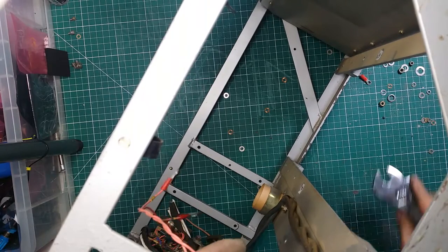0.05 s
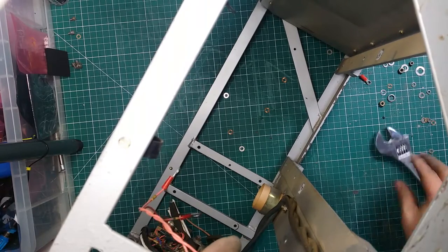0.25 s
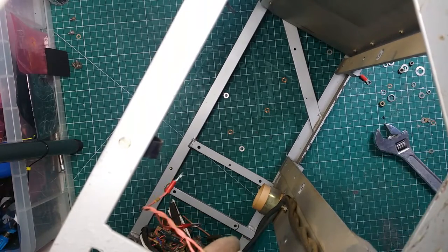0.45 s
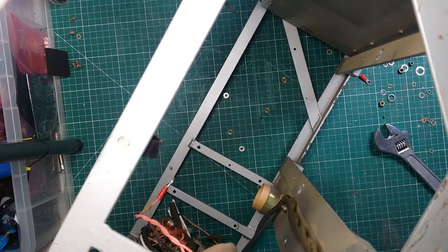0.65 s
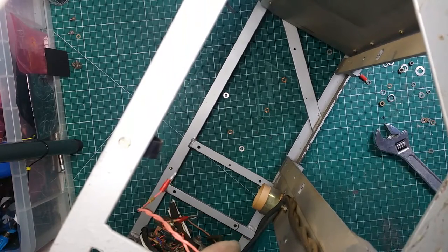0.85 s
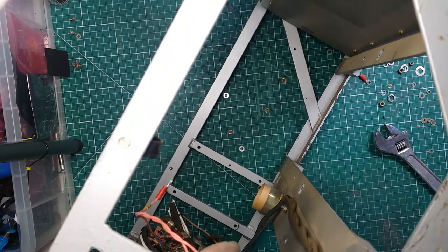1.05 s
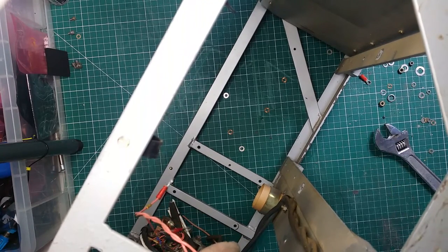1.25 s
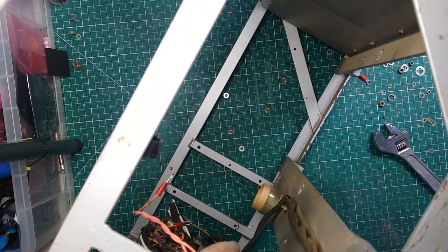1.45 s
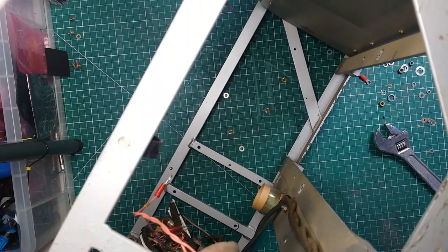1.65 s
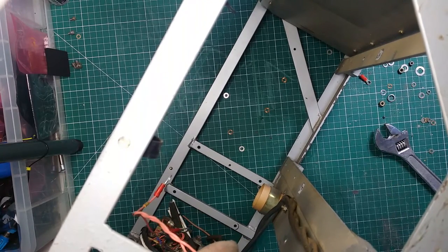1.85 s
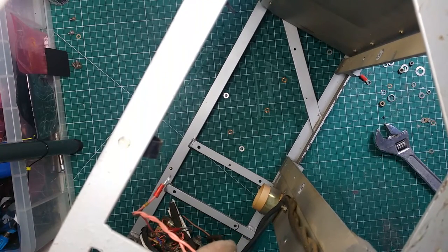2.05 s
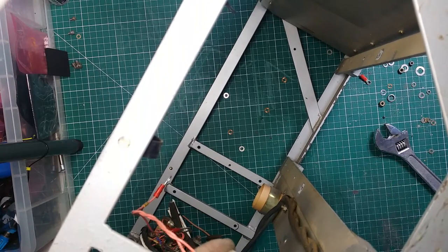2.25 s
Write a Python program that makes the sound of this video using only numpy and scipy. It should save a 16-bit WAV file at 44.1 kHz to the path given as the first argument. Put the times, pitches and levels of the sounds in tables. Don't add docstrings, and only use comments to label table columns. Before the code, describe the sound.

Heavy wrench set down with a thudding, rattling clatter, followed by quiet clinks and soft knocks

```python
import sys
import numpy as np
from scipy import signal
from scipy.fft import irfft
from scipy.io import wavfile
from scipy.ndimage import uniform_filter1d

SR = 44100
rng = np.random.default_rng(int(sys.argv[2]) if len(sys.argv) > 2 else 0)


def volts(x):
    e = np.asarray(x, float) / 20
    return 10 ** e


def persist_wave(psi):
    counts = np.round(np.clip(psi, -1, 1) * 32767).astype(np.int16)
    wavfile.write(sys.argv[1], SR, np.atleast_2d(counts).T)


N = 101429

# (frequency [Hz], level [dB])
BOARD_TONE = [(180, -55), (300, 3.5), (443, -3.5), (1130, -5), (1630, -7), (3440, -14.5), (4000, -14),
              (5200, -20), (8800, -120)]
PART_LAG_S = 0.0005


def evened(x):
    return x / np.sqrt(np.mean(x ** 2) + 1e-20)


def read(points, hz):
    f, value = np.transpose(points)
    return np.interp(np.log(hz + 1), np.log(f + 1), value)


def favour(f, hz, db, octaves):
    return db * np.exp(-(np.log2(np.asarray(f) / hz) / octaves) ** 2)


def add(mix, s, sound):
    part = mix[..., round(s * SR):][..., :sound.shape[-1]]
    part += sound[..., :part.shape[-1]]


def colour(x, points):
    hz = np.fft.rfftfreq(2048, 1 / SR)
    low_end = (points[0][0] / 4, -60)
    log = np.log(volts(read([low_end] + list(points), hz)))
    mirrored = np.r_[log, log[-2:0:-1]]
    taps = irfft(np.exp(signal.hilbert(mirrored).conj()[:1025]))
    return signal.oaconvolve(x, taps / np.linalg.norm(taps))[:len(x)]


def ring(modes, extra_db, size=12000, phase=0., longest=0.98):
    t = np.arange(size)[:, None] / SR
    hz, db, t60 = np.transpose(modes)
    gain = volts(db + extra_db)
    fade = volts(-60 * t / np.clip(t60, .02, longest))
    sines = gain * fade * np.sin(2 * np.pi * hz * t + phase)
    return sines.sum(1) / np.linalg.norm(gain)


def clicks(fade, per_s, uneven_db):
    draw = rng.random((3, len(fade)))
    hit = (draw[0] < per_s / SR) | (np.arange(len(fade)) == 0)
    size = volts(uneven_db * np.minimum(-np.log(draw[2]), 2.2))
    train = hit * np.sign(draw[1] - .5) * size * fade
    return train * np.linalg.norm(fade) / (np.linalg.norm(train) + 1e-9)


def placed(x, pan_db, lag_s=0.):
    late = np.r_[np.zeros(round(lag_s * SR)), x][:len(x)]
    return np.array([x * volts(pan_db / 2), late * volts(-pan_db / 2)])


def room(x, wet_db):
    # (frequency [Hz], time to fall 60 dB [s])
    echo_times = [(100, 0.44), (500, 0.21), (4000, 0.16), (15000, 0.12)]
    mono_hz, thin_hz = 200, 300
    at = np.arange(60, 22000, 20) + rng.integers(0, 20, (2, 1097))
    taps = np.zeros((2, 22050))
    np.put_along_axis(taps, at, rng.choice([-1., 1.], at.shape), 1)
    hz, t, z = signal.stft(taps, SR, nperseg=512)
    same = 1 / (1 + (hz[:, None] / mono_hz) ** 2)
    z = np.array([z[0], same * z[0] + np.sqrt(1 - same ** 2) * z[1]])
    fade = volts(-60 * t / read(echo_times, hz)[:, None])
    tail = signal.istft(z * fade, SR, nperseg=512)[1]
    tail = signal.lfilter(*signal.butter(1, thin_hz, 'high', fs=SR), tail / np.linalg.norm(tail[0]))
    return x + volts(wet_db) * signal.fftconvolve(x, tail, axes=1)[:, :N]


def air():
    # (frequency [Hz], level [dB])
    hush_tone = [(25, -41), (60, 5.5), (300, -0.5), (600, -9), (1300, -15), (7000, -13.5), (9000, -21),
                 (15500, -27)]
    # (frequency [Hz], likeness [0 to 1])
    likeness = [(40, .9), (300, .6), (2000, .2)]
    # (frequency [Hz], width [Hz], level [dB])
    hiss_bands = [(7130, 140, -78.5)]
    hush_db, patchy_db = -57, 1.5
    lumpy_db, lumpy_hz = 1, 350

    frames, hz = N // 256 + 5, np.fft.rfftfreq(1024, 1 / SR)
    a, b, c, d, patches = rng.standard_normal((frames, 513, 5)).T
    patches = evened(uniform_filter1d(uniform_filter1d(patches, 10, 0), 12, 1))
    swell = evened(uniform_filter1d(rng.standard_normal(frames), size=9))
    lumps = lumpy_db * swell / (1 + (hz[:, None] / lumpy_hz) ** 2)
    same = np.clip(read(likeness, hz), -1, 1)[:, None]
    left = a + 1j * b
    right = same * left + np.sqrt(1 - same ** 2) * (c + 1j * d)
    z = np.array([left, right]) * volts(patchy_db * patches + lumps)

    def noise(gain):
        return evened(signal.istft(z * gain[:, None], nperseg=1024, noverlap=768)[1][:, :N])

    hush = volts(hush_db) * noise(volts(read(hush_tone, hz)))
    for f, width, db in hiss_bands:
        hush = hush + volts(db) * noise(np.exp(-((hz - f) / max(width, 30)) ** 2))
    return hush


def bumps():
    # (time [s], level [dB], pitch [Hz])
    flexes = [(.0, -55.5, 48), (.275, -49, 60), (0.384, -31.5, 113.4), (.555, -44.5, 71), (0.638, -49, 99),
              (0.821, -54, 61.6), (1.029, -59, 66), (1.332, -46.5, 108), (1.538, -50.5, 61),
              (1.765, -47.5, 64.5), (2.142, -50, 63.4)]
    bump_s = .055
    out, t = np.zeros(N), np.arange(0, bump_s, 1 / SR)
    swell = np.sin(np.pi * t / bump_s) ** 2
    for s, db, hz in flexes:
        add(out, s, volts(db) * swell * np.sin(2 * np.pi * hz * t))
    return placed(out, -8)


def knocks():
    # (time [s], level [dB], pitch [Hz], rap share [dB], rap colour [Hz])
    soft_knocks = [(0.027, -48.5, 301, -5.5, 2050), (0.576, -43, 194, -5.5, 610),
                   (0.859, -50.5, 307, -13, 510), (0.909, -40, 202, -6, 706), (0.993, -45.5, 137, -21, 390),
                   (1.034, -45, 304, -8.5, 900), (1.11, -39, 201, -21, 1875), (1.164, -46, 175, -26.5, 470),
                   (1.306, -33, 203, -7.5, 698), (1.417, -39, 204.4, -21.5, 387),
                   (1.497, -43, 300, -6.5, 706), (1.526, -40, 250, -12.5, 493),
                   (1.641, -44, 154, -14.5, 390), (1.556, -36, 158, -5.5, 910),
                   (1.744, -33, 196, -10, 1077), (1.763, -32, 219, -13, 1030),
                   (1.841, -40.5, 190, -20, 1420), (1.965, -36.5, 208, -21, 674),
                   (1.984, -46.5, 225, -31, 600), (2.244, -47, 223, -22, 600),
                   (2.034, -39, 192, -22.5, 1470), (2.149, -33.5, 211, -8.5, 980)]
    knock_t60, rap_t60, board_s = 0.1, .07, 0.02
    rap_ring_db = -4
    out, t, f = np.zeros(N), np.arange(6000) / SR, np.geomspace(250, 6000, num=24)
    for s, db, hz, rap_db, rap_hz in soft_knocks:
        low = ring([(hz, 0, knock_t60), (hz * 1.55, -7, .7 * knock_t60)], 0, size=6000)
        low = low * np.minimum(t / .006, 1)
        tone = list(zip(f, read(BOARD_TONE, f) + favour(f, rap_hz, 9, 0.2)))
        rap = colour(clicks(np.exp(-(t / board_s) ** 2), 1800, 2.6), tone)
        rap = rap + volts(rap_ring_db) * ring([(rap_hz, 0, rap_t60)], 0, size=6000)
        add(out, s, volts(db) * (low + volts(rap_db) * rap))
    return room(placed(out, -3, PART_LAG_S), wet_db=-1.5)


def parts():
    # (time [s], level [dB], brightest [Hz], chatter length [s])
    handlings = [(0.588, -38.5, 5870, 0.019), (0.807, -42, 4900, 0.041), (0.913, -41, 4860, 0.02),
                 (1.033, -45, 3090, 0.031), (1.104, -46, 4770, .024), (1.304, -36, 4700, 0.032),
                 (1.307, -27, 1650, 0.0029), (1.416, -37.5, 5040, 0.006), (1.52, -30.5, 4540, 0.017),
                 (1.555, -37.5, 1830, 0.022), (1.606, -31.5, 5000, 0.014), (1.643, -40, 5400, 0.0073),
                 (1.73, -33.5, 5000, 0.019), (1.838, -39.5, 4100, 0.01), (1.932, -27.5, 4800, 0.011),
                 (2.032, -38, 4530, 0.01), (2.096, -40.5, 4660, 0.091), (2.126, -26.5, 2860, 0.019),
                 (2.143, -21, 5400, 0.0043), (2.148, -21.5, 1900, 0.0055), (2.2, -34, 2100, 0.01),
                 (2.295, -27.5, 4660, 0.024)]
    # (frequency [Hz], width [Hz], level [dB])
    part_notes = [(1650, 23, -1.5), (1952, 120, 19), (2940, 29, -14), (4270, 71, 9), (4630, 62, 13.5),
                  (4935, 27, 3.5), (5345, 240, 15), (6330, 87, -30)]
    # (frequency [Hz], level [dB])
    tick_tone = [(710, -41), (1200, -17.5), (1980, 9), (2460, -13), (2680, 3), (3430, -5.5), (6310, 1),
                 (15500, -18.5)]
    part_db, part_ring_db, chatter_per_s = -11, -5.5, 2400
    out, t, f = np.zeros(N), np.arange(8000) / SR, np.geomspace(1200, 15500, num=24)
    modes = [(hz, db, 2.2 / max(width, 40)) for hz, width, db in part_notes]
    mode_hz = np.transpose(modes)[0]
    luck = rng.standard_normal((len(handlings), len(modes)))
    for (s, db, hz, length), z in zip(handlings, luck):
        drive = clicks(np.exp(-t / max(length, .003)), chatter_per_s, 2.5)
        tone = list(zip(f, read(tick_tone, f) + favour(f, hz, 6.2, 0.38)))
        body = ring(modes, 3 * z + favour(mode_hz, hz, 9.0, 0.083), size=4000)
        ringing = signal.oaconvolve(drive, body / np.linalg.norm(body))[:len(t)]
        sound = colour(drive, tone) + volts(part_ring_db) * ringing
        add(out, s, volts(db + part_db) * sound)
    return room(placed(out, 6, PART_LAG_S), wet_db=1)


def thumps():
    # (time [s], level [dB], thump pitch [Hz], bench note favoured [Hz], thump length [s])
    landings = [
        (0.24, -11.5, 512, 913, 0.0073),
        (0.33, -19.5, 607, 669, 0.0061),
        (.3402, -8.5, 366, 1450, 0.0064),
        (0.44, -11, 335, 924, 0.0064),
        (0.48, -23, 364, 310, 0.00695),
    ]
    # (frequency [Hz], level [dB], time to fall 60 dB [s])
    bench_notes = [(108.4, -12, 0.79), (180, -10, 0.035), (282, -21, 0.18), (395.8, 13.5, 0.083),
                   (490, -13, 0.06), (668, -6, 0.36), (567.5, -14, 0.25), (912, 2, 0.045),
                   (1266, -19, 0.083), (1446, -6.5, 0.099), (2255, -3.5, 0.095)]
    push_hz, push_db, bench_db, slap_db = 193.7, -6, -3, -10
    thump_rise = 0.543
    out, t = np.zeros((2, N)), np.arange(12000) / SR
    bench_hz = np.transpose(bench_notes)[0]
    for s, db, hz, note_hz, length in landings:
        u = t / length
        sweep = 2 * np.pi * t * (0.675 + thump_rise * np.minimum(u, 2) / 2)
        push = volts(push_db) * u * np.exp(-(u / 1.78) ** 2.46) * np.sin(2 * np.pi * push_hz * t)
        thump = 2.06 * u * np.exp(-u ** 2.74) * np.sin(hz * sweep) + push
        near_db = favour(bench_hz, note_hz, 14, .15)
        for side in range(2):
            phase = 0.39 * side * np.log(bench_hz / 25)
            bench = np.minimum(2.6 * u, 1) * ring(bench_notes, near_db, phase=phase)
            slap = colour(clicks(np.exp(-t / 0.021), 2500, 5.9), BOARD_TONE)
            add(out[side], s, volts(db) * (thump + volts(bench_db) * bench + volts(slap_db) * slap))
    return room(out * volts([[-1.6], [1.6]]), wet_db=-4)


def wrench():
    # (time [s], level [dB], note struck most [Hz], jaw chatter [s], ring until damped [s])
    touches = [(.000, -37.5, 8190, 0.0035, 0.022), (.011, -29.5, 5964, .006, 0.014),
               (.013, -41.5, 12100, 0.0041, 0.012), (.018, -26.5, 2400, 0.021, 0.007),
               (.024, -28.5, 3755, 0.01, 0.011), (.022, -47.5, 8190, 0.0095, 0.03),
               (.035, -41, 5800, 0.011, 0.02), (.241, -23, 8450, 0.01, 0.087),
               (.247, -20.5, 10600, 0.01, 0.045), (.262, -21, 8630, 0.081, 0.029),
               (.243, -33, 14430, 0.0027, 0.054), (.329, -17, 6040, 0.0036, 0.013),
               (.3415, -11.5, 6487, 0.044, 0.02), (.343, -15, 14430, 0.0066, 0.069),
               (.352, -20, 12100, 0.015, 0.056), (.364, -10.5, 5900, 0.014, 0.0064),
               (.369, -10, 8380, 0.011, 0.009), (.376, -12, 6065, 0.054, 0.043),
               (.379, -16.5, 3755, 0.0055, 0.1), (.385, -17, 8190, 0.026, 0.033),
               (.420, -17.5, 14430, 0.0026, 0.046), (.4453, -16, 8190, 0.031, 0.049),
               (.4648, -10, 5843, 0.011, 0.031), (.467, -25, 8190, 0.027, 0.022),
               (.466, -22.5, 14430, .004, 0.023), (.490, -18.5, 5670, 0.024, 0.008),
               (.507, -28.5, 5960, 0.026, 0.041)]
    # (frequency [Hz], level [dB], time to fall 60 dB [s])
    steel = [(3755, -16, 0.4), (5905, -1, 0.17), (5980, -11.5, 0.096), (6487, -8.5, 0.18),
             (7700, -14, 0.092), (8190, -4.5, 0.48), (8530, -3.5, 0.17), (8800, -22, 0.26),
             (9065, -1, 0.11), (10600, -7, 0.19), (11660, -15, 0.15), (12100, -7.5, 0.13),
             (14430, -18, 0.14)]
    # (frequency [Hz], level [dB])
    clank_tone = [(1300, -15.5), (2400, -8), (4800, -16.5), (6200, -1.5), (8500, -7), (11500, -9.5),
                  (13200, -21), (16200, -36)]
    rattle_per_s, blow_s = 2200, 0.0009
    ring_db, buzz_db, tick_db, spread_db = -3, -15, -17, 2.5
    buzz_share = 0.17
    mute_s, mute_db = 0.0047, -28.5

    out, t = np.zeros((2, N)), np.arange(9000) / SR
    steel_hz, steel_db, steel_t60 = np.transpose(list(steel) + list(steel))
    is_twin = np.arange(len(steel_hz)) >= len(steel)
    luck = rng.standard_normal((len(touches), 3, len(steel_hz)))
    for (s, db, hz, length, until), (left, right, shift) in zip(touches, luck):
        split_hz = steel_hz * (1 + .007 * shift * is_twin)
        modes = np.transpose([split_hz, steel_db, steel_t60])
        buzz_modes = np.transpose([split_hz, steel_db, buzz_share * steel_t60])
        near_db = favour(split_hz, hz, 20, .04) - 4 * is_twin
        fade = np.exp(-t / max(length, .002))
        drive = clicks(fade, rattle_per_s, 1.7)
        other = clicks(fade, rattle_per_s, 2.7)
        mute = volts(mute_db / (1 + np.exp(np.clip((until - t) / mute_s, -50, 50))))
        blow = drive * np.exp(-t / blow_s)
        blow = blow / np.linalg.norm(blow)
        for side, z in enumerate((left, right)):
            clear = ring(modes, near_db + spread_db * z, size=9000, phase=2 * z, longest=.3) * mute
            short = ring(buzz_modes, .5 * near_db, size=3000, phase=2 * z)
            ringing = signal.oaconvolve(blow, clear)[:len(t)]
            buzz = signal.oaconvolve(drive, short / np.linalg.norm(short))[:len(t)]
            tick = colour(drive if side else .5 * drive + other, clank_tone)
            sound = volts(ring_db) * ringing + volts(buzz_db) * buzz + volts(tick_db) * tick
            add(out[side], s, volts(db) * sound)
    return room(out * volts([[1.2], [-1.2]]), wet_db=-5)


def scene():
    return air() + bumps() + knocks() + parts() + thumps() + wrench()


def top_cut(x):
    return signal.sosfilt(signal.butter(12, 16540, fs=SR, output="sos"), x)


def record(dry):
    low_pass = signal.firwin(255, 15250, fs=SR)
    mix = signal.oaconvolve(dry, low_pass[None], "same")
    return top_cut(mix)


dry = scene()
out = record(dry)
persist_wave(out)
```